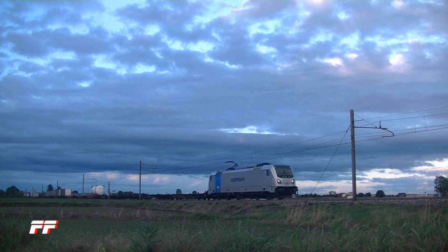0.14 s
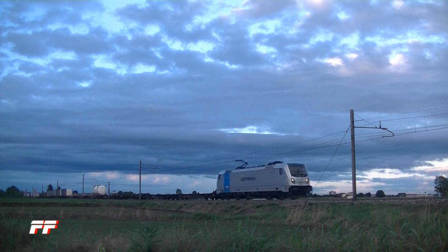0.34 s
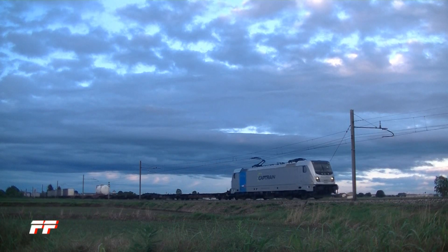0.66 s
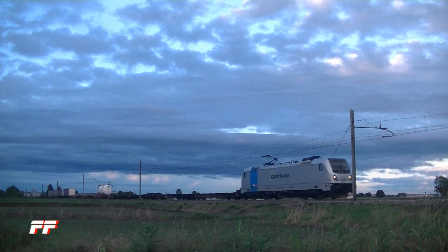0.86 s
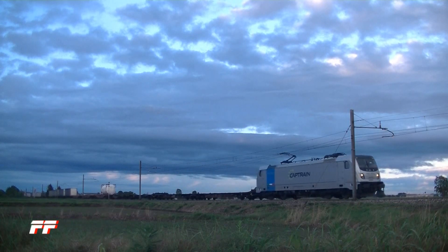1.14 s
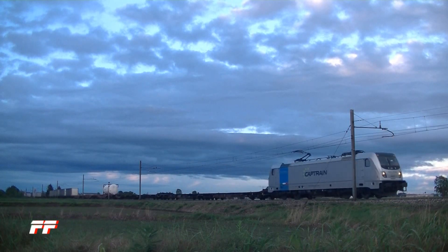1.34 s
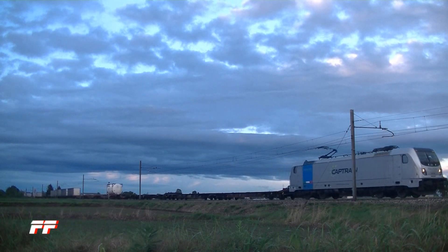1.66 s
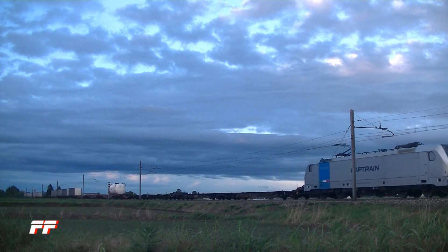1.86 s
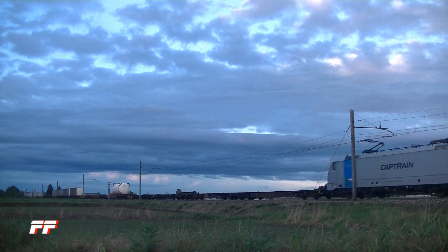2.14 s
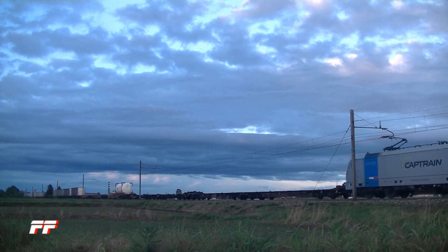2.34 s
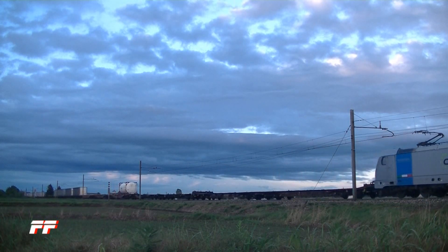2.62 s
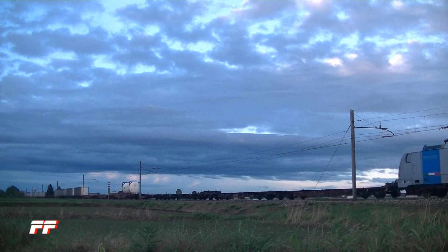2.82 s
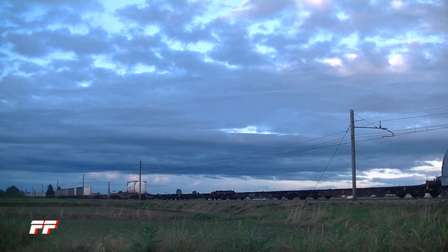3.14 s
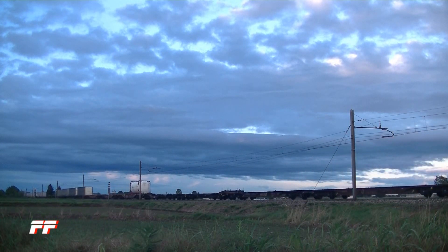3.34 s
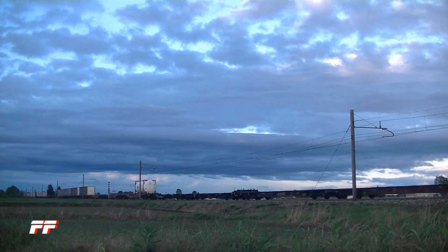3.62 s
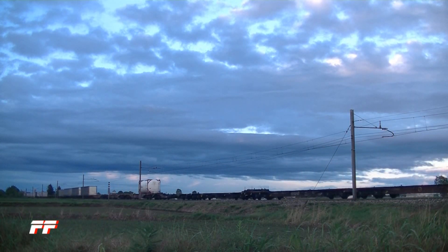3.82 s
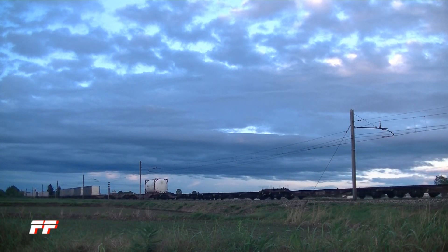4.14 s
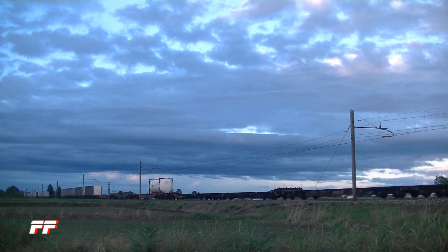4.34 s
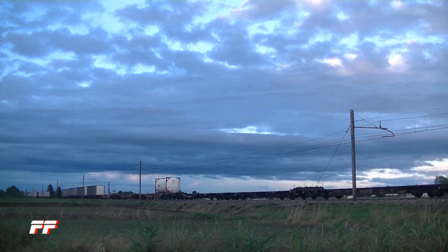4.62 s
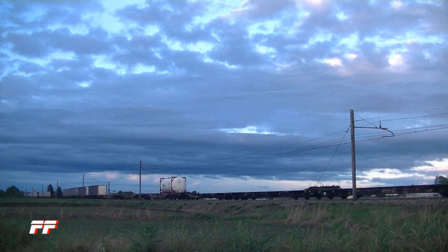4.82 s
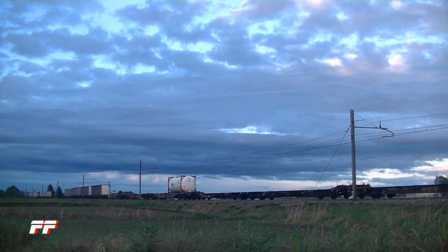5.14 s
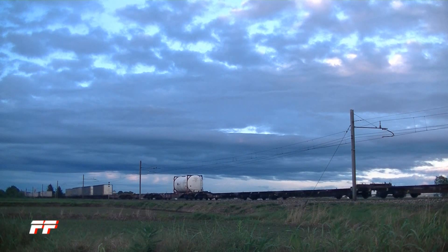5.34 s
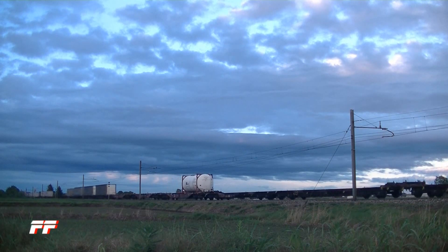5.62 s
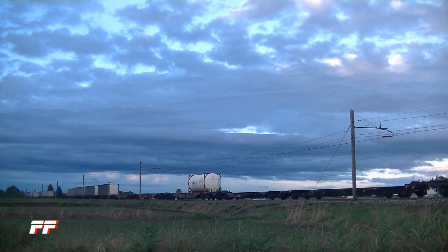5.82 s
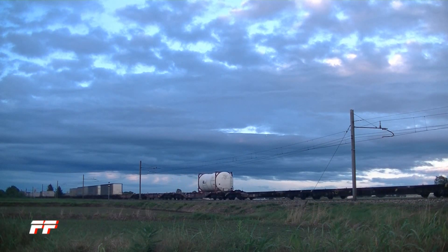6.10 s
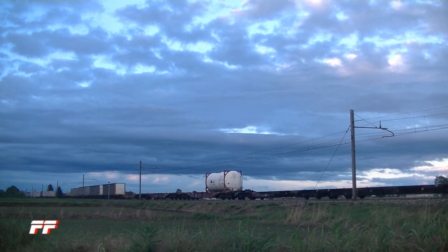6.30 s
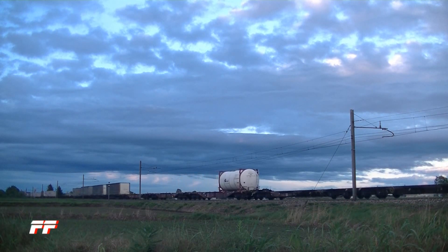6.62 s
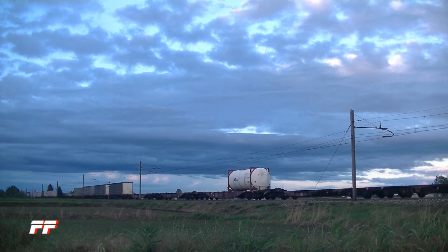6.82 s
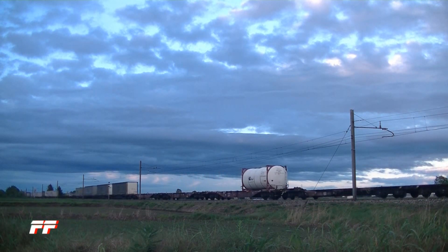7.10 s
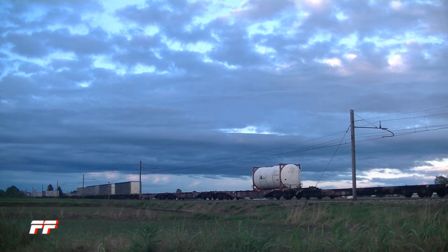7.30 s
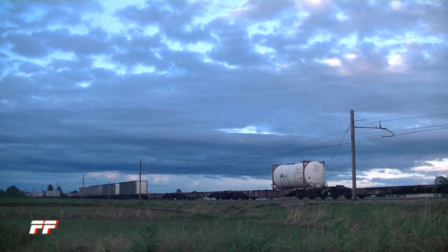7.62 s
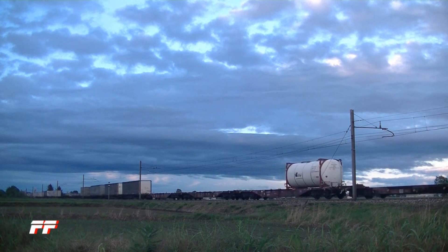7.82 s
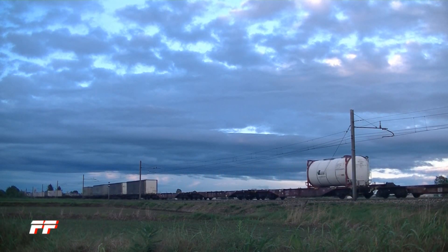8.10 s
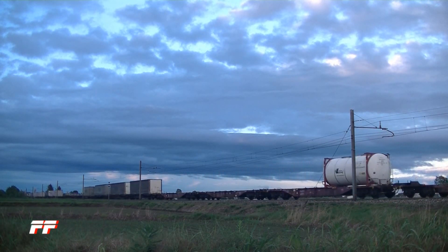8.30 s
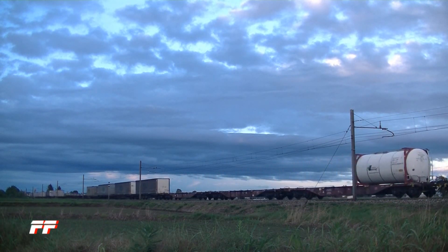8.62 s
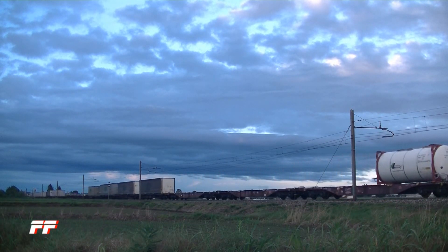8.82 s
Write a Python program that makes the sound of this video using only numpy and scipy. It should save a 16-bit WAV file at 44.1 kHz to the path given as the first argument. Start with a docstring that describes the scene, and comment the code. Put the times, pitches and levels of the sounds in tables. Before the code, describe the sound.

A faintly whining electric locomotive passes, followed by flat wagons with a steady rail rush, metallic rattles and brief wheel squeaks.

```python
"""An electric locomotive and a long line of flat wagons roll past a field on welded rail.
First the locomotive's fans drone and its drive whines, while rough steel makes sleepers rumble and
rails rush ever louder. Near 3 s its gears roar briefly and a high hiss passes. From about 4 s the
wagons roll by: each bogie (a set of wheels) rings and sinks in pitch, and loose steel fittings rattle,
hardest near 6 s. Towards the end the wheels' flanges (their guiding rims) scrape the rail and squeak."""
import sys
import numpy as np
from scipy import signal
from scipy.fft import rfft, irfft, next_fast_len
from scipy.io import wavfile
from scipy.ndimage import uniform_filter1d, map_coordinates

SR = 44100
rng = np.random.default_rng(int(sys.argv[2]) if len(sys.argv) > 2 else 0)


def wrap_up_sound(samples):
    """Save the sound to the file named by the first command line argument, as 16-bit audio."""
    columns = np.atleast_2d(samples).T
    # keep every value between -1 and 1, then stretch to whole-number steps
    tamed = np.clip(columns, -1, 1)
    steps = np.round(tamed * 32767).astype(np.int16)
    wavfile.write(sys.argv[1], SR, steps)


N = 394694

# The tone colours of six noises. Each row: frequency in Hz, relative strength there in dB.
SLEEPER_COLOUR = [(20, -40), (105, -42), (130, -39), (160, -24.5), (220, -16.5), (310, -17.5), (385, -10.5),
                  (450, -9.5), (560, -3.5), (670, -2.5), (750, 1.5), (900, -4), (1200, -11), (1700, -33),
                  (4000, -70)]  # the beams under the rails
RAIL_COLOUR = [(500, -51), (900, -6.5), (1240, -8.5), (1380, -3.5), (1480, -7.5), (1720, -5.5), (1810, 0.5),
               (2020, -.5), (2220, -2.5), (2500, 0.5), (2730, 0), (2900, 0.5), (3400, -12), (5000, -37),
               (7000, -63)]
WHEEL_COLOUR = [(1800, -45), (2700, -10.5), (3100, 0), (3500, -0.5), (4000, -0.5), (4450, -2.5), (4750, -3),
                (5200, -6), (5550, -14.5), (6100, -25), (7500, -25), (11000, -67)]
CONTACT_COLOUR = [(4000, -28), (5700, -8), (6200, -13.5), (6750, -3.5), (7300, 3), (7800, 1), (8300, -3.5),
                  (8900, -8.5), (9700, -23.5), (11000, -22), (15000, -39)]  # where wheel meets rail
HIGH_HISS_COLOUR = [(4000, -27), (5700, -0.5), (7000, -5), (9000, 5.5), (10400, -8.5), (11800, -2.5),
                    (13200, -0.5), (14200, -4), (15500, -10.5)]
SCRAPE_COLOUR = [(200, -90), (1200, -39), (2800, 1), (4400, -4), (5300, 2), (6200, -9), (7400, 2.5),
                 (8600, -2.5), (10300, -23.5), (13300, -20), (15500, -32)]  # the scrape of a knock
# Bogies coming by. Each row: time in seconds, then levels in dB of wheel ring, wheel rush, contact hiss.
BOGIES = [(0.2, -52, -44, -53), (2.601, -47.5, -49, -56), (3.351, -50, -45, -46.5), (4.02, -38.5, -35, -50),
          (4.78, -39.5, -32.5, -42), (5.35, -34.5, -35, -51), (6.3, -37, -31.3, -43.5),
          (6.849, -37, -32.5, -49), (7.761, -40.5, -29, -44), (8.1, -41, -36, -44.5),
          (8.9, -41, -36.5, -48.5)]
# The notes at which parts ring or drone. Each row: pitch in Hz, width in Hz, relative level in dB.
WHEEL_NOTES = [(1810, 20, -9.5), (2030, 70, -14), (3020, 120, -16), (3700, 26, -1), (4280, 36, -3),
               (4494, 32, -5.5)]
SCRAPED_WHEEL_NOTES = [(2930, 38, -1), (3060, 33, -1), (3485, 31, 4), (3895, 27, 2), (4310, 40, -6.5),
                       (5200, 42, -14), (7330, 50, -12), (7720, 34, -13)]
GEAR_NOTES = [(830, 47, -5), (946, 32, -4), (1011, 12, 6), (2010, 53, -0.5), (2590, 73, -1)]
FAN_NOTES = [(170, 21, -20), (290, 47, -15), (425, 27, -15.5), (543, 9, 0), (831, 14, -1.5),
             (1570, 28, -2.5), (1810, 5.6, -4), (1932, 16, 6.5)]
# The strongest wheel note. Each row: time in seconds, pitch in Hz, level in dB.
SINGING = [(0, 2575, -43), (0.45, 2570, -46.5), (1.25, 2550, -42.5), (2.1, 2560, -41), (2.7, 2560, -39),
           (3.1, 2560, -43), (3.5, 2555, -37.5), (4.03, 2550, -37), (4.17, 2550, -43), (4.42, 2532, -31.5),
           (4.8, 2540, -39), (5.03, 2540, -35), (5.6, 2500, -35.5), (6.1, 2520, -40), (6.35, 2525, -35),
           (6.6, 2530, -39), (7.5, 2520, -38.5), (8.06, 2495, -35.5), (8.3, 2510, -39), (8.9, 2520, -41)]
# The main knocks of loose fittings. Each row: start in seconds, relative level in dB,
# boost of the low notes and the scrape in dB, pitch in Hz that the blow brings out.
KNOCKS = [(0.7627, -33.5, -5, 7200), (0.9692, -34, 2, 5600), (4.0213, -25.5, 0, 7300),
          (4.5956, -30, -4, 8200), (4.697, -24, -1, 7260), (4.7716, -24, -2, 8200),
          (4.8294, -26.5, 5.5, 4200), (5.4021, -29, -1, 7300), (5.9423, -28, 4.5, 3100),
          (5.9898, -18.5, -2, 7400), (6.044, -22, 0, 5700), (6.1185, -21.5, 3, 7800),
          (6.1705, -32, -3, 7300), (6.2158, -24, 0, 7600), (6.2514, -25, -2, 7700), (6.3052, -29, -1, 7300),
          (6.3694, -25.5, 8, 3100), (6.3954, -23, -5, 7700), (6.4406, -23.5, 2.5, 4400),
          (6.8022, -30, 8, 3540), (7.0304, -29, 3, 7300), (7.1566, -29.5, 8, 7300),
          (7.5627, -25.5, 2.5, 5160), (7.6071, -24, -8, 7300), (7.669, -24, 2, 5200),
          (7.726, -29, -1, 5700), (7.7712, -23, 0, 4700)]
# The notes of the fittings on three wagons in turn.
# Each row: pitch in Hz, relative level in dB, seconds to fade by 60 dB (called t60 below).
FIRST_WAGON = [(2840, 1, 0.33), (4170, 0, 0.4), (5700, -8, 0.35), (6400, -15, .3), (7210, -1, 0.21),
               (7700, -2, .25), (8250, -2.5, 0.28), (8880, -15, .25)]
SECOND_WAGON = [(2900, 1, 0.28), (3060, 1.5, 0.23), (3490, 4, 0.28), (3870, -1, 0.3), (4370, 4, 0.3),
                (5622, -9, 0.45), (5735, -11.5, .55), (7340, 0.5, 0.34), (7660, -9, 0.33), (8200, -8, .25),
                (8600, -17, .25), (8900, -16, .25), (9790, -26, .3), (12050, -27, .15), (13280, -24, .15)]
THIRD_WAGON = [(3010, -1, 0.36), (3420, -4, 0.33), (3670, 6, 0.4), (4450, 1, .3), (4720, 1, .2),
               (5170, -5, .22), (5680, -7, .35), (6700, -14, .35), (7160, 0, 0.18)]
# The sinking whine of the drive. Each row: time in seconds, pitch in Hz.
WHINE_PITCH = [(0, 1031), (1, 1022), (1.7, 1013), (2.7, 1004), (3.7, 998), (5, 985)]
# How the locomotive's sounds swell and fade. Each row: time in seconds, relative level in dB.
WHINE_LEVEL = [(0.0, -43), (0.37, -53), (0.45, -44), (1.03, -54), (1.34, -35.5), (1.49, -60), (1.53, -40.5),
               (2.13, -47.5), (2.75, -37), (2.95, -51), (3.31, -56), (3.38, -36.5), (4.28, -40),
               (4.45, -43)]
LOCO_HISS_LEVEL = [(0.0, -75), (0.87, -58), (1.23, -60), (2.8, -50), (2.87, -54), (3.3, -47), (3.47, -47),
                   (3.57, -52), (3.72, -51), (3.82, -54.5), (4.35, -60)]
FAN_LEVEL = [(0, -50.5), (1.3, -47), (2.8, -44.5), (4, -45.5), (5.5, -46), (7, -75)]
# Flanges brushing the rail. Each row: time in seconds, pitch in Hz, level in dB.
SQUEAKS = [(0.43, 5360, -46), (7.47, 4500, -33.5), (7.545, 2950, -30), (7.58, 5220, -36),
           (7.785, 4730, -33), (7.865, 3030, -29), (7.92, 5140, -33.5)]
# Flanges scraping the rail. Each row: time and half length in seconds, hiss in dB, wheel ring in dB.
FLANGE_SCRAPES = [(4.77, 0.19, -56, -50), (6.374, 0.023, -59, -32), (6.445, .03, -41, -25.5),
                  (7.7, .03, -49, -39)]
# How alike left and right are in the noises. Each row: frequency in Hz, likeness (1 means the same).
STEREO_LIKENESS = [(40, -.2), (80, -0.34), (140, 0.96), (400, 0.99), (3200, 0.99), (4300, 1), (5300, 1),
                   (6100, 0.58), (7200, 0.97), (8200, 0.92), (10000, 1), (14000, 1)]
# The microphone's two openings. Each row: frequency in Hz, left minus right in dB, left lead in radians.
MIC_PORTS = [(120, -0.5, -0.32), (400, -1.6, -0.34), (750, -3, -0.12), (2100, -2.5, 0.1),
             (2750, -3.5, 0.16), (3300, -1.8, 0.43), (3500, 0.5, .16), (3970, -1.2, -.03),
             (5200, -1.5, -0.04), (5860, 3, -.35), (6260, -10, .35), (6900, -1.5, -.1), (7500, -1, -0.31),
             (8100, -2.5, .05), (8500, -5, .25), (9300, -.2, 0.017), (11000, -0.5, 0)]
# The sound leans left while the train is ahead. Each row: time in seconds, left minus right in dB.
BALANCE = [(0, 2.2), (2.5, 0.4), (8.9, -0.13)]

BLOW_RISE_S = .0006  # how fast a knock builds up


def rolling(sway_db=0.17, rail_judder_db=0.35, wheel_judder_db=.5, contact_judder_db=0.8):
    """Roughness between wheel and rail shakes sleepers, rails and wheels; each bogie adds treble."""
    sleeper_db = approach(full_db=-36, db_per_s=3.32, arrival_s=4.78)
    rail_db = approach(full_db=-31, db_per_s=2.9, arrival_s=2.83)
    wheel_db = approach(full_db=-32.5, db_per_s=2.64, arrival_s=3.5)
    contact_db = approach(full_db=-45, db_per_s=2.8, arrival_s=0.93)
    wheel_swell, contact_swell = bogie_swells()
    wheel_gain = np.sqrt(amp(wheel_db) ** 2 + wheel_swell)
    contact_gain = np.sqrt(amp(contact_db) ** 2 + contact_swell)
    judder = wobble(30)  # uneven wheel treads shake the three higher layers together
    sleepers = amp(sleeper_db + sway_db * wobble(13)) * rush(SLEEPER_COLOUR, patchy_db=1.13)
    rails = amp(rail_db + rail_judder_db * judder) * rush(RAIL_COLOUR, patchy_db=1.5)
    wheels = wheel_gain * amp(wheel_judder_db * judder) * rush(WHEEL_COLOUR, patchy_db=2.0)
    contact = contact_gain * amp(contact_judder_db * judder) * rush(CONTACT_COLOUR, patchy_db=3.0)
    return sleepers + rails + wheels + contact


def bogie_swells(half_s=0.22):
    """The power that passing bogies add to the wheel rush and to the contact hiss."""
    return sum(amp([[rush_db], [hiss_db]]) ** 2 * passing(s, half_s) ** 2
               for s, _, rush_db, hiss_db in BOGIES)


def wheel_ring(doppler=.016, glide_s=.9, swell_s=0.66, fade_db_per_s=7):
    """Each bogie's ringing wheels swell and sink in pitch as they come by (the Doppler effect)."""
    t = np.arange(N) / SR
    out = np.zeros(N)
    for s, db, _, _ in BOGIES:
        pitch_ratio = 1 - doppler * np.tanh((t - s) / glide_s)
        ring = np.interp(np.cumsum(pitch_ratio) % N, np.arange(N), ringing_noise(WHEEL_NOTES))
        nearness = np.sqrt(passing(s, swell_s))
        fade = amp(-fade_db_per_s * np.maximum(t - s, 0))  # once past the microphone's front
        out += amp(db + 1.4 * wobble(11)) * nearness * fade * ring
    return out


def singing_wheel(width_hz=38, waver_hz=13, flutter_db=1.0):
    """The strongest wheel note sings in uneven swells and wanders in pitch."""
    pitch, db = curves(SINGING)
    slow_noise = filtered(rng.standard_normal((2, N)), lambda hz: 1 / (1 + (hz / width_hz) ** 2))
    phase = 2 * np.pi * np.cumsum(pitch + waver_hz * wobble(26)) / SR
    note = unit(slow_noise[0] * np.cos(phase) + slow_noise[1] * np.sin(phase))
    return amp(db + flutter_db * wobble(17)) * note


def fittings(ring_db=-15, scrape_db=-15.5, scrape_t60=0.28, tick_db=-9.5, tick_t60=0.037):
    """Loose steel parts knock on the wagon frames, each with a ring, a scrape and a short tick."""
    t = np.arange(SR // 4, dtype=np.float32) / SR
    onset = (1 - np.exp(-t / BLOW_RISE_S)) ** 2
    grit = spread(rng.standard_normal((2, N)), SCRAPE_COLOUR)
    rings, grit_power = np.zeros((2, N + 2 * SR))
    for s, db, body_db, favoured_hz in list(KNOCKS) + clinks():
        wagon = FIRST_WAGON if s < 5.7 else SECOND_WAGON if s < 7.3 else THIRD_WAGON
        span = slice(round(s * SR), round(s * SR) + len(t))
        rings[span] += onset * amp(db + ring_db) * clank(wagon, body_db, favoured_hz, t)
        grit_power[span] += (onset * amp(db + scrape_db + body_db - 60 * t / scrape_t60)) ** 2
        grit_power[span] += (onset * amp(db + tick_db - 60 * t / tick_t60)) ** 2
    return rings[:N] + np.sqrt(grit_power[:N]) * grit


def clank(notes, body_db, favoured_hz, t, scatter_db=3.0, favour_db=5.5, favour_width_hz=190,
          jingle_db=-5, jingle_t60=0.2, count=26):
    """A struck fitting rings at its own notes, among many short ones that depend on where it is hit."""
    jingle_hz = 2600 * 5 ** rng.random(count)
    jingle_levels = jingle_db + along(SCRAPE_COLOUR, jingle_hz)
    jingle = np.column_stack([jingle_hz, jingle_levels, np.full(count, jingle_t60)])
    hz, note_db, t60 = np.vstack([notes, jingle]).T[:, :, None].astype(np.float32)
    strength, detune, phase = rng.standard_normal((3, len(hz), 1)).astype(np.float32)
    level = note_db + scatter_db * strength + body_db * (hz < 5500)  # heavy blows lift the low notes
    spot_db = favour_db * np.exp(-((hz - favoured_hz) / favour_width_hz) ** 2)  # the spot hit lifts some
    tones = np.sin(2 * np.pi * (hz * (1 + 0.0019 * detune) * t + phase))
    return (amp(level + spot_db - 60 * t / t60) * tones).sum(0)


def clinks(first_s=3.7, stray_db=-40.5, range_db=6, count=56,
           per_bogie=6, spread_s=.16, over_hiss_db=4, scatter_db=2.0, body_db=6.0):
    """Small random knocks, in rows like KNOCKS: the wagons clink all along, and most near bogies."""
    strays = [(first_s + (N / SR - first_s) * when, stray_db + range_db * size)
              for when, size in rng.random((count, 2))]
    rattles = [(s + spread_s * when, hiss_db + over_hiss_db + scatter_db * size)
               for s, _, _, hiss_db in BOGIES if s > first_s
               for when, size in rng.standard_normal((per_bogie, 2))]
    return [(s, db, body_db, rng.uniform(2700, 9100)) for s, db in strays + rattles]


def drive_whine(waver_hz=3.46, trim_db=-2, rough_db=2.0, octave_db=-43, octave_rough_db=4.5):
    """The drive whines on a note and its octave, both sinking in pitch as it comes by."""
    pitch, = curves(WHINE_PITCH)
    phase = 2 * np.pi * np.cumsum(pitch + waver_hz * wobble(35)) / SR
    note_db = receding(WHINE_LEVEL, db_per_s=12) + trim_db + rough_db * wobble(25.16)
    octave_gain = amp(octave_db + octave_rough_db * wobble(30.02)) * passing(s=1.6, half_s=1.5)
    octave_phase = 2 * phase + 0.61 * wobble(60)  # the wobble blurs its pitch
    return amp(note_db) * np.sin(phase) + octave_gain * np.sin(octave_phase)


def gears(db=-35):
    """The gears roar briefly as the locomotive's bogies come by."""
    return amp(db) * passing(s=2.71, half_s=0.28) * ringing_noise(GEAR_NOTES)


def flange_squeaks(waver_hz=55, rough_db=4.0, touch_s=.032):
    """A flange that brushes the rail sets off one wheel note for a moment."""
    t = np.arange(N) / SR
    waver = waver_hz * wobble(160)
    out = np.zeros(N)
    for s, hz, db in SQUEAKS:
        touch = np.exp(-((t - s) / touch_s) ** 2)
        out += amp(db) * touch * np.sin(2 * np.pi * np.cumsum(hz + waver) / SR)
    return amp(rough_db * wobble(140)) * out


def scraped_wheels(stretch=2.4):
    """A scraping flange sets its wheel ringing for longer than the scrape hisses."""
    gain = sum(amp(db) * passing(s, stretch * half_s) ** 2 for s, half_s, _, db in FLANGE_SCRAPES)
    return gain * ringing_noise(SCRAPED_WHEEL_NOTES)


def high_hiss(loco_boost_db=3.5, steady_db=-62, bogie_trim_db=-12, flutter_db=0.7):
    """A high hiss peaks as the locomotive passes, then returns with each bogie and flange scrape."""
    loco = amp(receding(LOCO_HISS_LEVEL, db_per_s=6) + loco_boost_db) ** 2
    _, contact_swell = bogie_swells()
    wagons = amp(steady_db) ** 2 + amp(bogie_trim_db) ** 2 * contact_swell
    scrapes = sum((amp(db) * passing(s, half_s)) ** 2 for s, half_s, db, _ in FLANGE_SCRAPES)
    gain = np.sqrt(loco + wagons + scrapes) * amp(flutter_db * wobble(22))
    return gain * rush(HIGH_HISS_COLOUR, patchy_db=-0.5)


def fans():
    """The locomotive's cooling fans drone on a few blurred notes."""
    fan_db, = curves(FAN_LEVEL)
    return amp(fan_db) * ringing_noise(FAN_NOTES)


def microphone(x):
    """Each opening colours its side a little differently, and the balance drifts rightwards."""
    port_hz, tilt_db, lead = np.transpose(MIC_PORTS)
    balance_db, = curves(BALANCE)
    sides = np.array([[.5], [-.5]])  # left, right
    gain = lambda hz: amp(sides * np.interp(hz, port_hz, tilt_db))
    phase_shift = lambda hz: np.exp(1j * sides * np.interp(hz, port_hz, lead))
    return filtered(x, lambda hz: gain(hz) * phase_shift(hz)) * amp(sides * balance_db)


def rush(colour, patchy_db):
    """Stereo noise in which narrow patches swell and fade, as rough steel rings at shifting pitches."""
    spectra = signal.stft(rng.standard_normal((2, N)), nperseg=1024)[2]
    patches = uniform_filter1d(rng.standard_normal(spectra.shape[1:]), size=2, axis=0)  # blur in pitch
    patches = uniform_filter1d(patches, size=14, axis=1)  # blur in time
    noise = signal.istft(spectra * amp(patchy_db * unit(patches)), nperseg=1024)[1]
    return spread(noise[:, :N], colour)


def ringing_noise(notes, low_cut_hz=130):
    """Noise narrowed down to the given notes, at an average (rms) level of 1."""
    peaks = lambda f: sum(amp(db) / (1 + ((f - hz) / width) ** 2) for hz, width, db in notes)
    return unit(filtered(rng.standard_normal(N), lambda f: peaks(f) / (1 + (low_cut_hz / (f + 1)) ** 8)))


def spread(pair, colour):
    """Colour two unrelated noises and blend them into a mostly alike left and right."""
    angle = lambda hz: np.arccos(np.clip(along(STEREO_LIKENESS, hz), -1, 1)) / 2
    mid, side = filtered(pair, lambda hz: amp(along(colour, hz)) * [np.cos(angle(hz)), np.sin(angle(hz))])
    return unit(np.array([mid + side, mid - side]))


def approach(full_db, db_per_s, arrival_s, bend_s=0.55):
    """Level in dB of a long source that grows steadily, then holds once it is alongside."""
    t = np.arange(N) / SR
    return full_db - db_per_s * bend_s * np.logaddexp(0, (arrival_s - t) / bend_s)


def passing(s, half_s):
    """Gain of a source that beams sideways: 1 at time s, half that half_s before and after."""
    return 1 / (1 + ((np.arange(N) / SR - s) / half_s) ** 2)


def receding(rows, db_per_s):
    """A level curve in dB that fades steadily after its last row."""
    return curves(rows)[0] - db_per_s * np.maximum(np.arange(N) / SR - rows[-1][0], 0)


def wobble(rate):
    """A smooth random curve through `rate` random values a second."""
    values = rng.standard_normal(2048)
    coarse = np.arange(0, N + 64, 64)
    return np.interp(np.arange(N), coarse, map_coordinates(values, [coarse * rate / SR], mode="wrap"))


def filtered(x, response):
    """Scale each frequency in x by response(hz)."""
    size = next_fast_len(N + SR // 4)
    return irfft(rfft(x, size) * response(np.fft.rfftfreq(size, 1 / SR)), size)[..., :N]


def curves(rows):
    """Join timed rows with straight lines: one curve for each column after the time."""
    times, *columns = np.transpose(rows)
    return [np.interp(np.arange(N) / SR, times, column) for column in columns]


def along(rows, hz):
    """Read between (Hz, value) rows, with octaves evenly spaced."""
    row_hz, values = np.transpose(rows)
    return np.interp(np.log(hz + 1), np.log(row_hz + 1), values)


def amp(db):
    """Turn decibels into a gain."""
    return 10 ** (np.asarray(db) / 20)


def unit(x):
    """Scale to an average (rms) level of 1."""
    return x / np.sqrt(np.mean(x ** 2) + 1e-20)


def scene():
    """The train runs from ahead to the right of the microphone."""
    locomotive = drive_whine() + gears() + fans()
    wheels = rolling() + wheel_ring() + singing_wheel() + high_hiss()
    wheels = wheels + scraped_wheels() + flange_squeaks()
    return microphone(locomotive + wheels + fittings())


def record(dry, top_hz=15780):
    """The very highest treble is cut off."""
    return filtered(dry, lambda hz: hz < top_hz)


dry = scene()
out = record(dry)
wrap_up_sound(out)
```